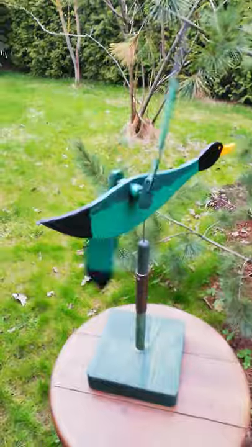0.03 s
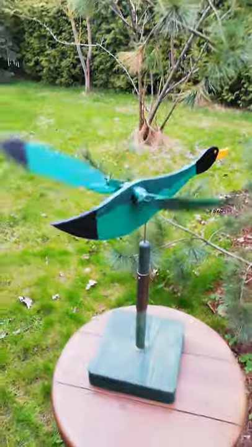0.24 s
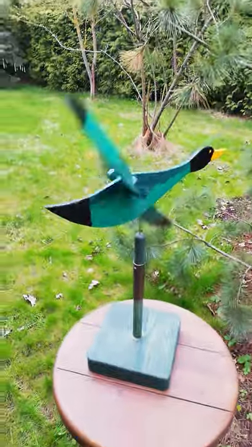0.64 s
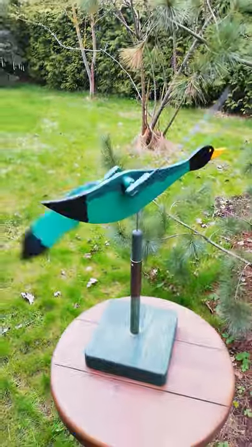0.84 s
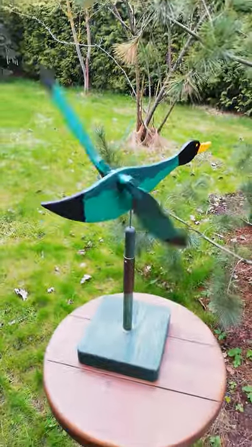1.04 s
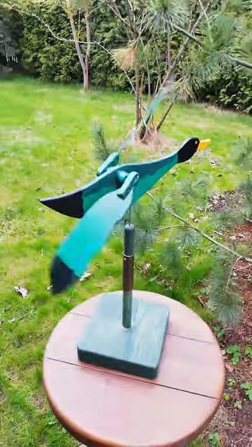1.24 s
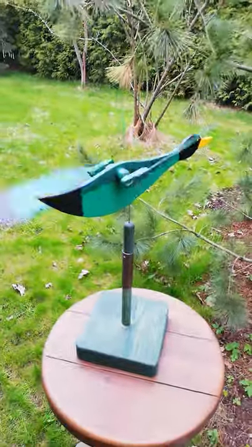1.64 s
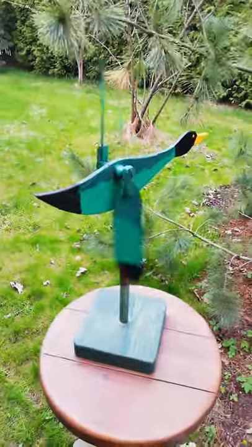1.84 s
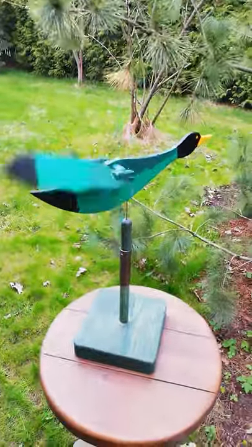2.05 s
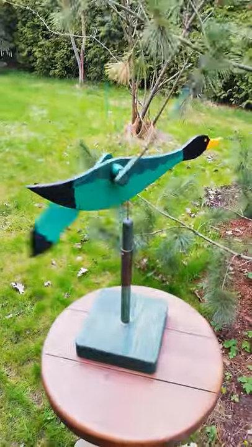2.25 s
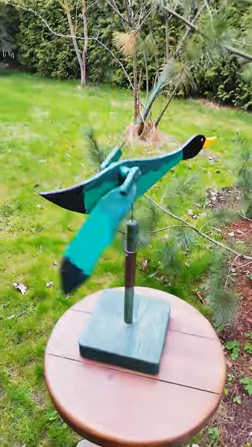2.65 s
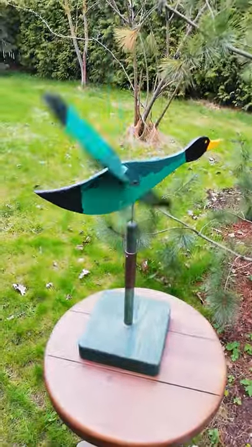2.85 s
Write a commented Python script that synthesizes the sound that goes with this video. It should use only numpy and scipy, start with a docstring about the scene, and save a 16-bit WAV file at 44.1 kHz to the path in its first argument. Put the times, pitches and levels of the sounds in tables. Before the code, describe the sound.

Gusty wind rumbles against the microphones outdoors, over a soft wash of distant trees. A nearby wooden garden spinner gives tiny repeated squeaks and light knocks, with faint bird chirps and a few dry, sharp clicks close on the right.

```python
"""A breezy garden, where a wooden whirligig turns close to a pair of microphones. Its axle sticks and slips,
squeaking about every three quarters of a second, and its loose blades knock lightly on the hub. Small birds
chirp behind it. Wind rumbles and pops on the microphones, a few sharp clicks land right beside the right one, a
last click gives the final blade knock its crisp edge, and far away the wind washes through the trees."""
import sys
import numpy as np
from scipy import signal
from scipy.fft import rfft, irfft
from scipy.io import wavfile
from scipy.ndimage import uniform_filter1d

SR = 44100
rng = np.random.default_rng(int(sys.argv[2]) if len(sys.argv) > 2 else 0)


def inscribe(sig):
    """Save sig as 16-bit PCM at rate SR to the path in sys.argv[1].

    A 1-D sig is mono; a 2-D sig holds one channel per row.
    Samples are clipped to [-1, 1] before scaling.
    """
    pcm = np.round(np.clip(np.atleast_2d(sig).T, -1, 1) * 32767)
    wavfile.write(sys.argv[1], SR, pcm.astype(np.int16))


N = 127890
TIME = np.arange(N) / SR

# Levels in the tables are relative. Balance is left minus right.
# Likeness says how alike the two sides are: 1 the same, 0 unrelated, -1 opposite.
# axle squeaks (start [s], length [s], pitch [Hz], level [dB], balance [dB], brightness [dB per harmonic],
# purity [how far the strongest harmonic stands out], scoop [share of the pitch it starts below])
SQUEAKS = [(0.595, 0.027, 1980, -47, -15, -1, 0.93, 0.0049),
           (0.649, 0.013, 1977, -35.5, 12, 0.5, 1.8, 0.0053),
           (0.658, 0.025, 1972, -39.5, 9, -1, 1.07, 0.032),
           (1.426, 0.028, 1980, -40.5, 15, 1.5, 1.25, 0.015), (1.645, 0.019, 1966, -55, 3, -1, 3, 0.012),
           (2.075, .012, 1950, -49, -7, 3.5, 1.7, 0.0075), (2.15, 0.017, 1983, -43, 11, 1.5, 0.85, 0.037),
           (2.355, 0.03, 1970, -42.5, 11, 8, 2.8, 0), (2.877, .035, 1988, -42.5, 14, -.5, 1.07, 0.043)]
# harmonics of a squeak, lowest first (level [dB])
SQUEAK_HARMONICS = [-2, -3, 4.5, -2, -9, -23]
# thin axle squeals
# (start [s], length [s], first pitch [Hz], middle pitch [Hz], last pitch [Hz], level [dB], balance [dB])
SQUEALS = [(1.001, 0.01, 6200, 5910, 5630, -30, 6), (2.306, 0.0089, 5850, 5900, 5960, -40.5, 15),
           (2.316, 0.031, 5890, 5780, 5730, -34.5, 7), (2.38, 0.062, 5990, 6040, 6280, -55.5, 1)]
# dry rubs of the axle (time [s], half width [s], level [dB], centre [Hz])
RUBS = [(.895, 0.032, -58.5, 3800), (2.19, 0.038, -62, 6370), (2.255, 0.046, -57, 3250)]
# knocks of the blades on the hub (time [s], level [dB])
KNOCKS = [(1.019, -16.5), (1.521, -18.5), (1.747, -17.5), (2.674, -6)]
# tone of a knock (frequency [Hz], level [dB])
KNOCK_SPECTRUM = [(300, -38), (1500, -20), (3400, -4), (4900, -26), (6500, -14.5), (7900, 0), (10200, -4),
                  (11200, -31), (16000, -28)]
# bird chirps
# (start [s], length [s], first pitch [Hz], middle pitch [Hz], last pitch [Hz], level [dB], balance [dB])
CHIRPS = [(0.208, 0.017, 5380, 4960, 3660, -38.5, -3), (.263, 0.034, 3070, 4390, 5370, -45, 5),
          (0.792, 0.047, 5450, 5360, 5100, -58.5, -10), (0.83, 0.047, 5400, 4530, 3880, -51, -10),
          (0.878, 0.048, 3330, 2550, 2200, -56, -10), (1.265, 0.084, 5080, 4870, 4800, -70, 3),
          (1.364, 0.042, 5600, 5480, 5400, -60, -10), (1.402, 0.045, 6000, 4740, 4400, -49, -11),
          (1.445, 0.041, 3240, 2620, 2360, -55.5, -12), (1.465, 0.022, 5300, 3890, 2560, -53.5, -10),
          (1.49, 0.19, 4040, 4040, 4280, -64.5, -9), (2.222, 0.032, 3576, 3210, 2980, -54, -2)]
# sharp clicks; the last row is the crisp start of the final blade knock (time [s], level [dB], dull above [Hz],
# rattle level [dB])
CLICKS = [(1.0752, -18, 9000, -3), (1.0797, -1, 10500, -11), (1.0826, -7, 1600, -12),
          (1.0838, 0, 9000, -13), (1.0859, -1, 10000, -13), (1.0861, 5, 3000, -14), (1.0863, 0, 6500, -12),
          (1.6195, -5, 7300, -18), (1.62043, -5, 7300, -18), (1.7641, -6.5, 8500, -3),
          (1.76522, -3.5, 11000, -8), (2.6703, -26, 9000, -2)]
# tone of a click (frequency [Hz], level [dB])
CLICK_SPECTRUM = [(60, 0), (400, -5.5), (1200, -4), (2800, 0.5), (6500, 4), (9000, 2.5), (11000, -3),
                  (13000, 3), (15000, 6), (17000, 0)]
# gusts on the microphones (time [s], level [dB])
GUSTS = [(.22, -33), (.39, -36), (.55, -41.5), (.73, -41.5), (1.26, -37), (1.32, -30.5), (1.42, -31.5),
         (1.5, -38.5), (1.61, -38), (1.68, -28), (1.77, -32.5), (1.98, -30.5), (2.06, -34.5), (2.22, -37),
         (2.32, -45), (2.42, -31.5), (2.56, -37.5), (2.77, -50), (2.89, -45.5)]
# deep rumble of the wind (frequency [Hz], level [dB])
RUMBLE_SPECTRUM = [(10, -23), (22, -2), (40, 3), (70, 1), (115, -0.5), (170, -7.5), (250, -12.5),
                   (330, -25), (480, -30.5), (900, -57), (3000, -85.5)]
# higher flutter of the wind (frequency [Hz], level [dB])
FLUTTER_SPECTRUM = [(50, -17), (150, -4), (250, 4.5), (330, -3), (430, -23.5), (600, -14), (1500, -112)]
# how alike the wind is on both microphones (frequency [Hz], likeness [-1 to 1])
WIND_LIKENESS = [(30, 0.98), (130, 0.97), (250, 0.91), (500, 0.72)]
# brief puffs of wind (time [s], half width [s], level [dB])
PUFFS = [(1.692, 0.045, -37.5), (1.947, 0.017, -31.5), (2.385, 0.023, -32.5)]
# tone of a puff (frequency [Hz], level [dB])
PUFF_SPECTRUM = [(30, -21), (120, -2), (230, -0.5), (360, -1.5), (520, -13), (800, -22), (2000, -78)]
# swirls of air popping on the microphones (time [s], centre [Hz], level [dB])
POPS = [(.386, 179, -23), (.785, 59, -24), (1.0116, 220, -23.5), (1.292, 202, -28.5), (1.309, 148, -22.5),
        (1.685, 266, -21.5), (1.704, 123, -13.5), (1.7949, 145, -21), (1.965, 105, -16),
        (2.0145, 265, -18.5), (2.382, 259, -17), (2.3909, 310, -14)]
# wind in the far trees (time [s], level [dB])
TREE_LEVELS = [(.22, -41), (.3, -46), (.95, -47.5), (1.15, -49.5), (2.0, -51.5), (2.89, -53.5)]
# tone of the trees (frequency [Hz], level [dB])
TREE_SPECTRUM = [(30, -40), (250, -1), (450, -8.5), (650, -4), (850, 3.5), (1300, -1.5), (1900, -6),
                 (2350, -15.5), (3200, -17.5), (4500, -23.5), (6500, -30.5), (9800, -33.5), (11500, -42.5),
                 (15500, -40.5)]
# which side the trees are louder on (frequency [Hz], balance [dB])
TREE_BALANCE = [(200, -15), (700, 7), (1290, -2), (2380, -4), (4400, -2), (8000, 1)]
# faint hiss (frequency [Hz], level [dB])
HISS_SPECTRUM = [(500, 14), (3000, -16), (6000, -3), (10000, 0.5), (11500, -5), (15500, -8)]
# how alike the background is on both sides (frequency [Hz], likeness [-1 to 1])
BACKGROUND_LIKENESS = [(100, 1), (300, 0.79), (640, -0.81), (1400, 0.5), (3100, -0.35), (6800, -0.086)]

RASP_HZ = 650  # how fast the level trembles in squeaks, squeals and chirps


def axle_squeaks(scoop_s=.007, jitter=.008, flutter_db=2, fade_s=.004):
    """The axle sticks and slips: it scoops up to its pitch, and its upper harmonics rasp."""
    out = np.zeros((2, N))
    for start, length, hz, db, balance_db, brightness_db, purity, scoop in SQUEAKS:
        t = np.arange(0, length, 1 / SR)
        pitch = hz * (1 - scoop * np.exp(-t / scoop_s) + jitter * wander(len(t), 190))
        phase = 2 * np.pi * np.cumsum(pitch) / SR
        tone = np.zeros((2, len(t)))
        for k, harmonic_db in enumerate(SQUEAK_HARMONICS, 1):
            rasp = 1 + .075 * k * wander(len(t), RASP_HZ)
            wobble_db = flutter_db * np.array([wander(len(t), 75) for side in tone])
            tone += amp(purity * harmonic_db + brightness_db * k + wobble_db) * rasp * np.sin(k * phase)
        add(out, start, panned(amp(db) * fade_ends(t, length, fade_s) * unit(tone), balance_db))
    return out


def axle_squeals():
    """The axle also squeals: thin, high tones that are almost pure."""
    return glides(SQUEALS, octave_db=-27.5, jitter=.008)


def axle_rubs(spread=.22):
    """When the axle slides without squeaking, friction makes a soft noise in one broad band."""
    out = np.zeros((2, N))
    for s, width, db, hz in RUBS:
        band = signal.butter(2, [hz * (1 - spread), hz * (1 + spread)], "band", fs=SR)
        friction = unit(signal.lfilter(*band, rng.standard_normal((2, N))))
        out += amp(db) * swell(s, width) * friction
    return out


def blade_knocks(decay_s=.0014):
    """Loose wooden blades tick against the hub, and each tick dies at once."""
    out, t = np.zeros((2, N)), TIME[:2048]
    for s, db in KNOCKS:
        burst = rng.standard_normal((2, len(t))) * np.exp(-t / decay_s)
        add(out, s, amp(db) * burst / np.linalg.norm(burst[0]))
    return colour(out, KNOCK_SPECTRUM)


def bird_chirps():
    """Small birds give short, unsteady whistles, most of them falling in pitch."""
    return glides(CHIRPS, octave_db=-15.5, jitter=.017)


def sharp_clicks(boost_db=3, left_db=-31, rattle_s=.0014):
    """Dry snaps, most in tight clusters: each is a pulse with a tiny rattle, far to the right. The last one
    gives the final blade knock its crisp start."""
    out, t = np.zeros((2, N)), TIME[:512]
    for s, db, dull_hz, rattle_db in CLICKS:
        rattle = rng.standard_normal(len(t)) * np.exp(-t / rattle_s)
        snap = signal.unit_impulse(len(t)) + amp(rattle_db) * rattle / np.linalg.norm(rattle)
        snap = signal.lfilter(*signal.butter(3, dull_hz, fs=SR), snap)
        add(out, s, amp(db + boost_db) * amp([[left_db], [0]]) * snap)
    return colour(out, CLICK_SPECTRUM)


def microphone_wind(strong_gust_db=-28, flutter_growth=.44, crossing_s=.0007):
    """Gusts hit the microphones with a lumpy rumble and a faster flutter, plus brief puffs and pops."""
    gust_db = np.interp(TIME, *np.transpose(GUSTS))
    rumble = flicker(noise(RUMBLE_SPECTRUM, WIND_LIKENESS), depth_db=3, rate_hz=28)
    rumble *= amp(gust_db + 3)
    flutter = flicker(noise(FLUTTER_SPECTRUM, WIND_LIKENESS), depth_db=4, rate_hz=86)
    flutter *= amp(-45.5 + flutter_growth * (gust_db - strong_gust_db))
    puff_gain = sum(amp(db) * swell(s, width) for s, width, db in PUFFS)
    puffs = puff_gain * noise(PUFF_SPECTRUM, WIND_LIKENESS)
    left, right = rumble + flutter + puffs + wind_pops()
    # the air reaches the right microphone a moment after the left
    return np.array([left, np.interp(TIME - crossing_s, TIME, right)])


def wind_pops(balance_db=5.5):
    """Each swirl of air gives one short swing of pressure; small swirls sound higher."""
    out, t = np.zeros((2, N)), TIME[:SR // 16]
    for s, hz, db in POPS:
        u = (np.pi * hz * (t - t.mean())) ** 2
        swing = rng.choice([-1, 1]) * (1 - 2 * u) * np.exp(-u)
        add(out, s - t.mean(), panned(amp(db) * swing, balance_db))
    return out


def garden_echoes(x, gap_s=.002, fade_60_db_s=.13, echoes_per_s=2000):
    """Short, scattered echoes come back from the table, the ground and the hedge."""
    t = TIME[:SR // 2]
    echoes = rng.standard_normal((2, len(t))) * (rng.random((2, len(t))) < echoes_per_s / SR)
    echoes *= (t > gap_s) * amp(-60 * t / fade_60_db_s)
    echoes /= np.linalg.norm(echoes, axis=1, keepdims=True)
    return signal.oaconvolve(x, echoes, axes=1)[:, :N]


def distant_trees(boost_db=4, hiss_db=-66.5):
    """Wind washes through far trees and slowly eases, over a faint steady hiss."""
    level_db = np.interp(TIME, *np.transpose(TREE_LEVELS)) + boost_db
    trees = noise(TREE_SPECTRUM, BACKGROUND_LIKENESS, patchy_db=1, balance=TREE_BALANCE)
    hiss = noise(HISS_SPECTRUM, BACKGROUND_LIKENESS)
    return amp(level_db) * trees + amp(hiss_db) * hiss


def glides(rows, octave_db, jitter):
    """Unsteady whistles, each sliding through three pitches, with a faint tone an octave above."""
    out = np.zeros((2, N))
    for start, length, first_hz, middle_hz, last_hz, db, balance_db in rows:
        progress = np.arange(0, length, 1 / SR) / length
        hz = np.polyval(np.polyfit([0, .5, 1], [first_hz, middle_hz, last_hz], 2), progress)
        phase = 2 * np.pi * np.cumsum(hz * (1 + jitter * wander(len(hz), 300))) / SR
        tone = unit(np.sin(phase) + amp(octave_db) * np.sin(2 * phase))
        rasp = 1 + 24 * jitter * wander(len(hz), RASP_HZ)  # a shakier pitch also rasps more
        add(out, start, panned(amp(db) * fade_ends(progress, 1, edge=.36) * rasp * tone, balance_db))
    return out


def noise(spectrum, likeness, patchy_db=0, balance=None, size=2048):
    """Stereo noise with a given tone and likeness; patchy_db adds drifting louder and softer patches."""
    hz = np.fft.rfftfreq(size, 1 / SR)
    a, b, c, d, patches = rng.standard_normal((5, N * 4 // size + 5, len(hz)))
    patches = unit(uniform_filter1d(uniform_filter1d(patches, size=5, axis=0), size=16, axis=1))
    same = np.clip(read(likeness, hz), -1, 1)
    left = a + 1j * b
    right = same * left + np.sqrt(1 - same ** 2) * (c + 1j * d)
    frames = np.array([left, right]) * amp(read(spectrum, hz) + patchy_db * patches)
    if balance:
        frames *= amp(np.array([1, -1])[:, None, None] * read(balance, hz) / 2)
    _, sound = signal.istft(frames.swapaxes(1, 2), nperseg=size, noverlap=size * 3 // 4)
    return unit(sound[:, :N])


def colour(x, spectrum):
    """Gives a sound a tone, with a filter that rings only after each hit."""
    log_gain = np.log(amp(read(spectrum, abs(np.fft.fftfreq(2048, 1 / SR)))))
    taps = np.fft.ifft(np.exp(np.conj(signal.hilbert(log_gain)))).real[:1024]
    return signal.oaconvolve(x, taps[None], axes=1)[:, :N]


def wander(count, rate_hz):
    """A smooth random wobble of about size one, mostly slower than rate_hz."""
    size = max(count, SR // 2)
    hz = np.fft.rfftfreq(size, 1 / SR)
    return unit(irfft(rfft(rng.standard_normal(size)) / (1 + (hz / rate_hz) ** 4), size))[:count]


def flicker(x, depth_db, rate_hz):
    """Makes the level waver at random around an average of one."""
    return unit(x * amp(depth_db * wander(N, rate_hz)))


def swell(s, width):
    """A bell-shaped rise and fall around time s."""
    return np.exp(-.5 * ((TIME - s) / width) ** 2)


def fade_ends(t, length, edge):
    """A smooth fade in and out, each as long as edge."""
    return np.sin(np.pi / 2 * np.clip(np.minimum(t, length - t) / edge, 0, 1)) ** 2


def panned(x, balance_db):
    """Places a sound between left and right, keeping its power."""
    return unit(amp([[balance_db / 2], [-balance_db / 2]])) * x


def add(mix, s, sound):
    """Adds a stereo sound at time s."""
    part = mix[:, round(s * SR):][:, :sound.shape[1]]
    part += sound[:, :part.shape[1]]


def read(points, hz):
    """Reads between a table's points on a log-frequency axis."""
    f, value = np.transpose(points)
    return np.interp(np.log(hz + 1), np.log(f + 1), value)


def amp(db):
    """Turns decibels into a gain."""
    return 10 ** (np.asarray(db) / 20)


def unit(x):
    """Scales to an average (rms) level of one."""
    return x / np.sqrt(np.mean(x ** 2) + 1e-20)


def scene():
    """The whirligig and the birds with their echoes, plus clicks and wind."""
    squeaks, knocks = axle_squeaks(), blade_knocks()
    birds, squeals = bird_chirps(), axle_squeals()
    echoes = garden_echoes(amp(-13) * squeaks + amp(-17) * squeals + amp(-3) * birds + amp(-8) * knocks)
    whirligig = squeaks + squeals + axle_rubs() + knocks
    return whirligig + birds + echoes + sharp_clicks() + microphone_wind() + distant_trees()


def record(dry, start_s=.2125, ceiling=.58, top_hz=16300):
    """Silence until the sound cuts in; the loudest clicks are squashed and the highest treble is cut."""
    fade_in = np.clip((TIME - start_s) / .001, 0, 1)
    squashed = ceiling * np.tanh(dry * fade_in / ceiling)
    lowpass = signal.firwin(255, top_hz, window=("kaiser", 9), fs=SR)
    return signal.oaconvolve(squashed, lowpass[None], "same", axes=1)


dry = scene()
out = record(dry)
inscribe(out)
```